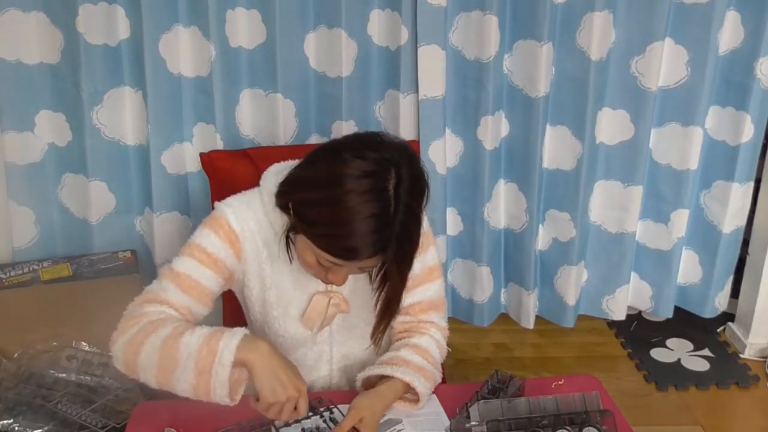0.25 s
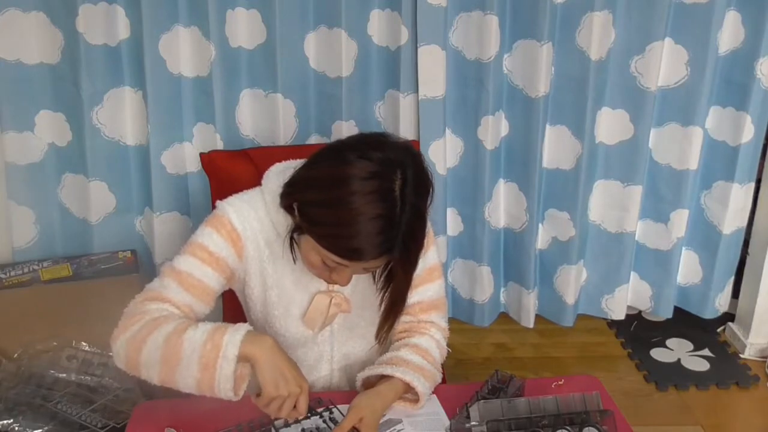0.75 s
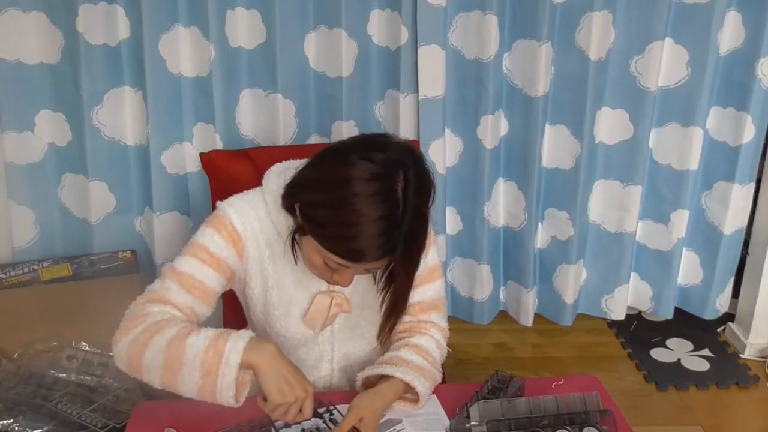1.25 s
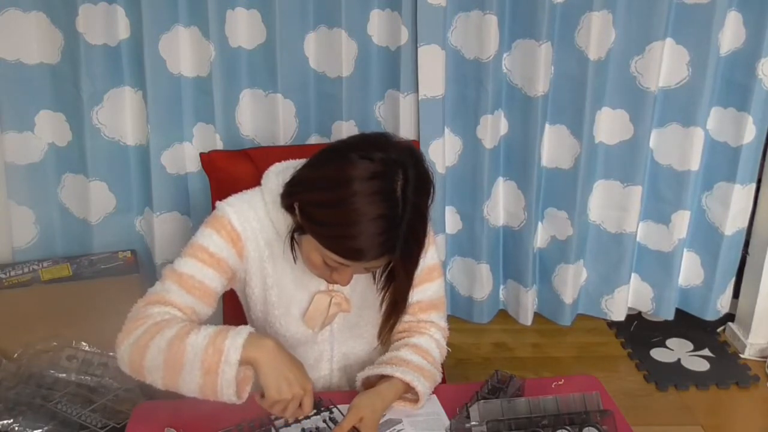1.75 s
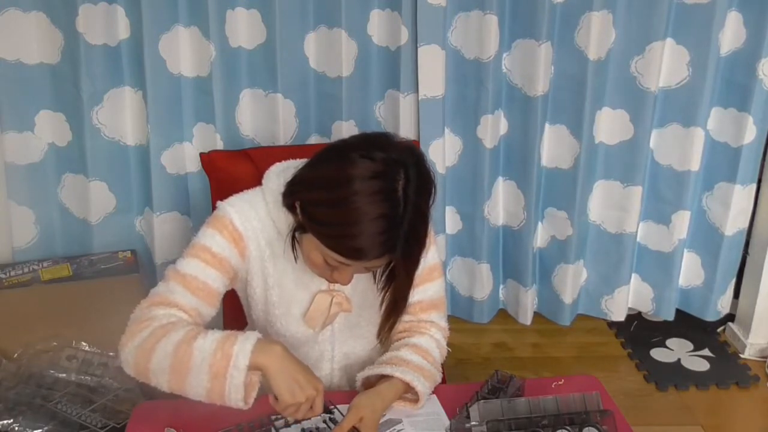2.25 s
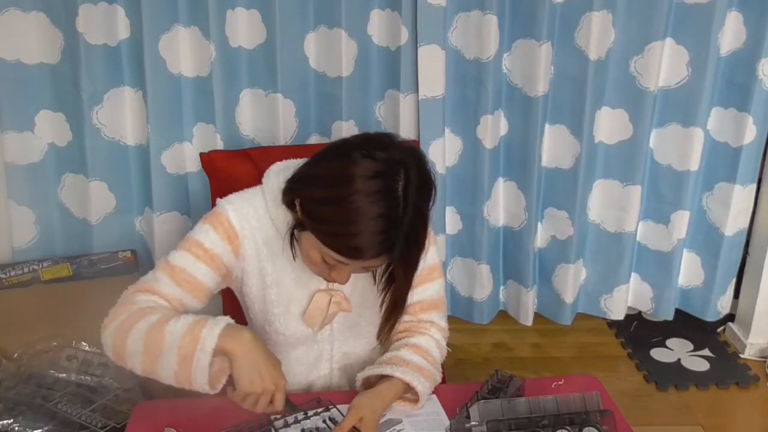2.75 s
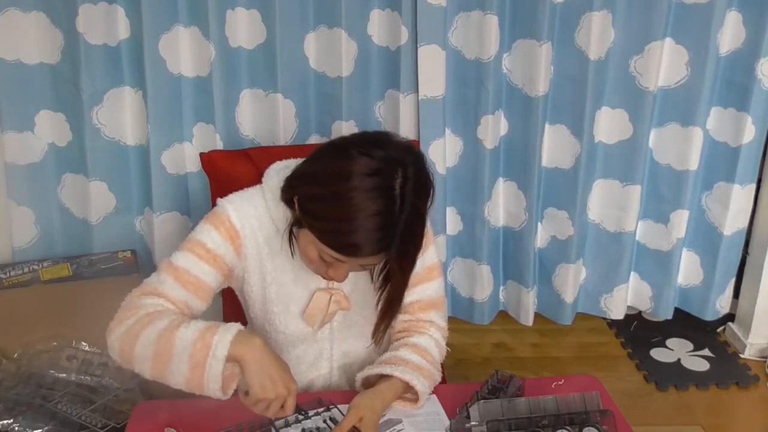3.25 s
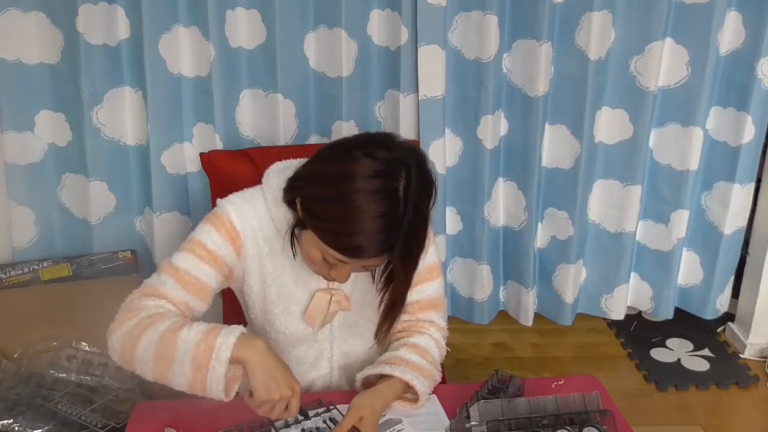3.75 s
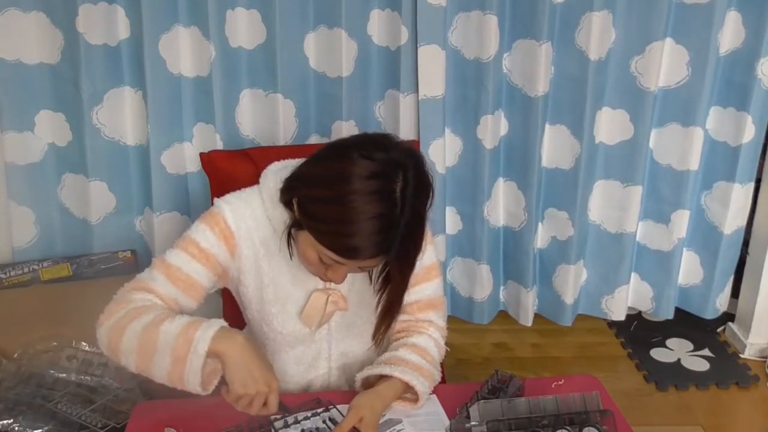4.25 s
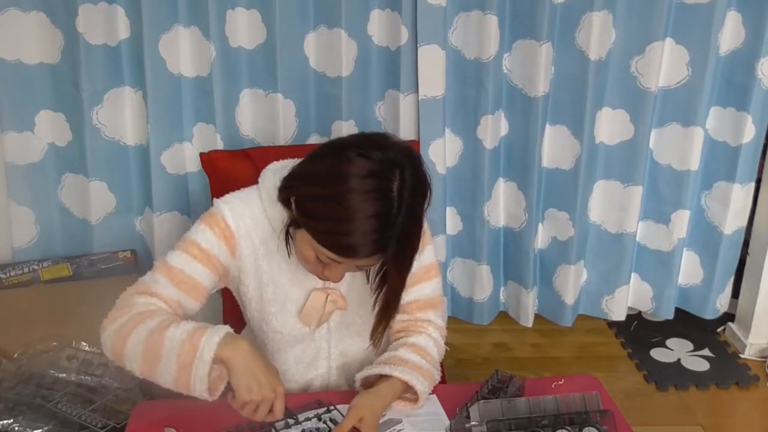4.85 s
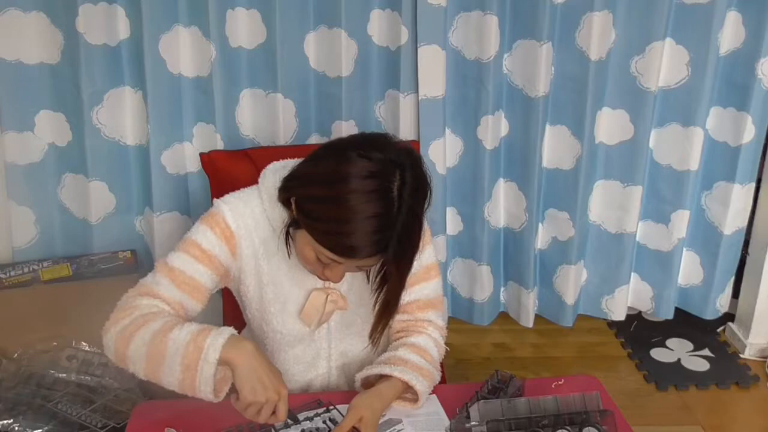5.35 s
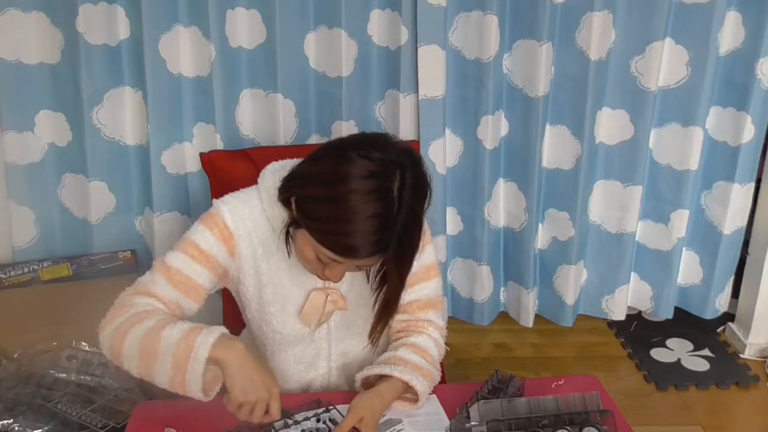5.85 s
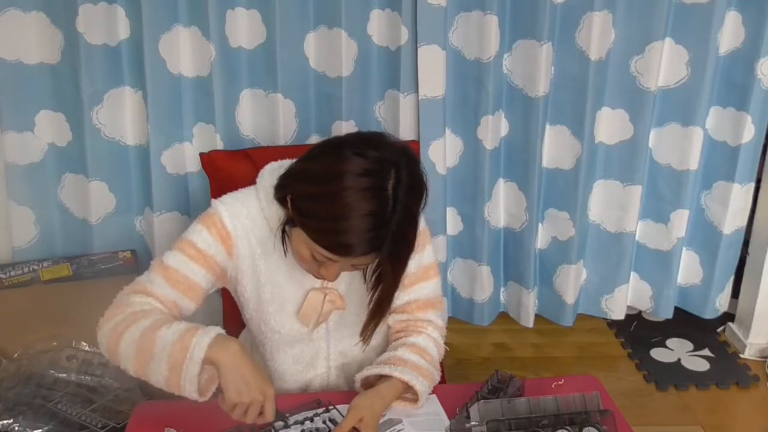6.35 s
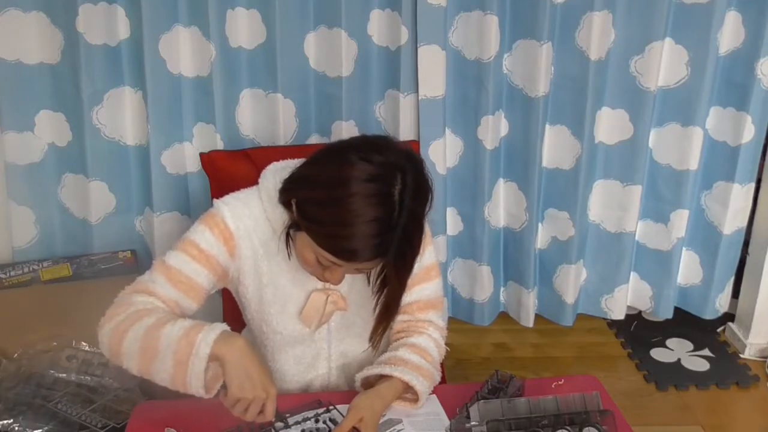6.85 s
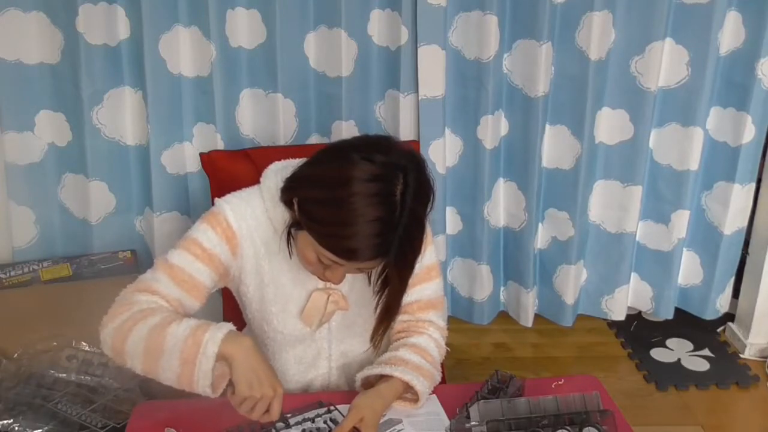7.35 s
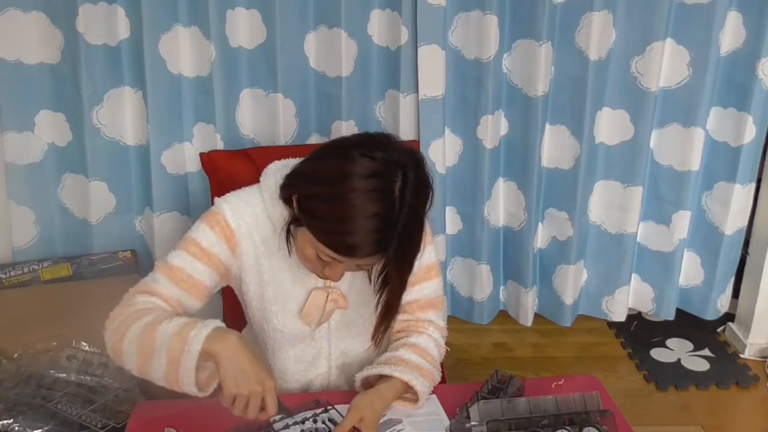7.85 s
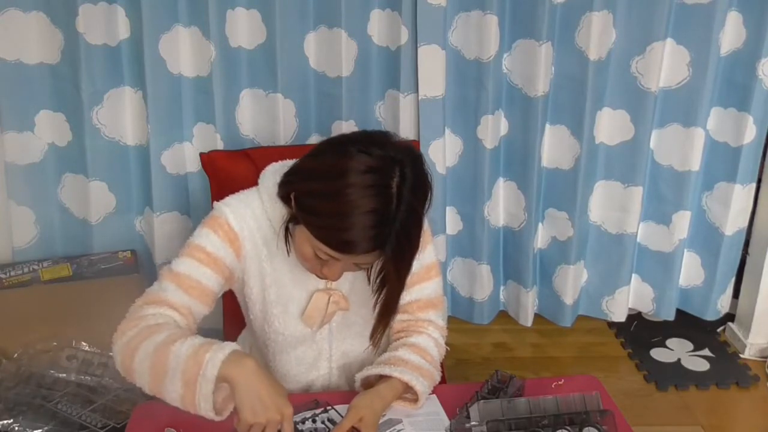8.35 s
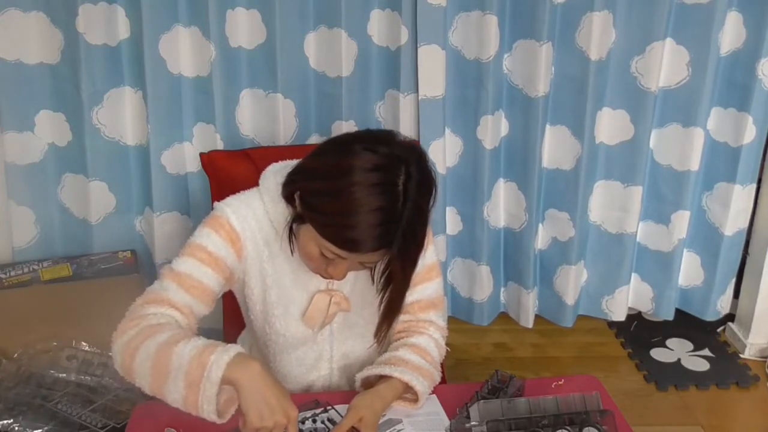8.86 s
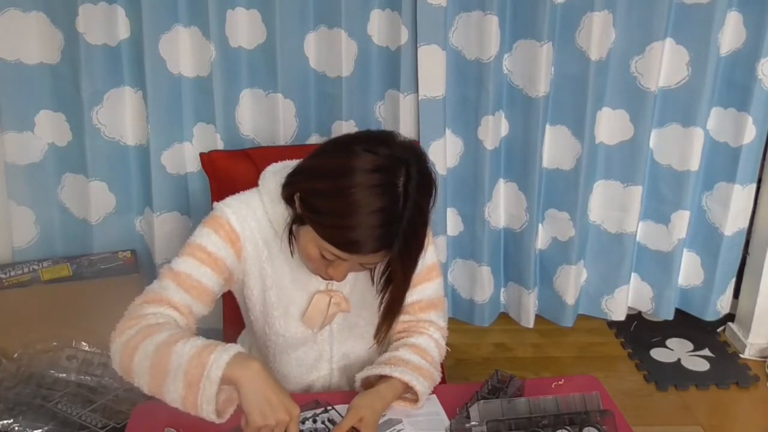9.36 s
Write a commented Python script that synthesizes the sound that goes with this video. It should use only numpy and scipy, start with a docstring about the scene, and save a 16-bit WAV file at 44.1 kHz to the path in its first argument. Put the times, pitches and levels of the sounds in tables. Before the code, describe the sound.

Steel nippers tap, scrape and sharply snip plastic parts from a rattly frame at a table, over a steady low fan hum.

```python
"""In a small curtained room, parts are cut from a plastic model kit frame with steel nippers, at a table.
The jaws tap and scrape on the frame and ring briefly; each cut is a sharp crack that shakes the frame.
Contacts are short coloured noise bursts, rings are dying sine waves, and sliding is a run of tiny slips.
A ventilation fan hums steadily behind: shaped noise with resonances, a mains hum, hiss and a thin whine."""
import sys
import numpy as np
from scipy import signal
from scipy.fft import rfft, irfft
from scipy.io import wavfile
from scipy.ndimage import uniform_filter1d

SR = 44100
rng = np.random.default_rng(int(sys.argv[2]) if len(sys.argv) > 2 else 0)


def transcribe(u):
    """Save the signal u as a 16-bit wav file named by the first command-line argument.

    u: samples, shape (n,) or (channels, n), limited to [-1, 1]; the rate is SR.
    q: integer samples, one column per channel.
    """
    v = np.clip(np.atleast_2d(u).T, -1, 1)
    q = np.round(v * 32767).astype(np.int16)
    wavfile.write(sys.argv[1], SR, q)


N = 423360  # length of the scene in samples
SIZE = 8192  # length of one short sound in samples
AGE = np.arange(SIZE) / SR  # seconds since a short sound began

# colour of fine friction and of ticks: pitch_hz [Hz], level_db [dB]
FRICTION_COLOUR = [(1500, -28), (4000, -14), (6000, -11.5), (8000, 1.5), (11300, 0), (13500, -4),
                   (16000, -19)]


def from_db(db):
    """Turn decibels into a gain."""
    return 10 ** (np.asarray(db) / 20)


def at_hz(points, hz):
    """Read a spectrum's level in dB at any pitch, joining its points on a log-frequency axis."""
    point_hz, level_db = np.transpose(points)
    return np.interp(np.log(np.maximum(hz, 1)), np.log(point_hz), level_db)


def dying(t60):
    """Envelope that falls by 60 dB in t60 seconds."""
    return np.exp(-np.log(1000) * AGE / t60)


def unit_energy(x):
    """Scale a sound so that its squares sum to one."""
    return x / np.sqrt(np.sum(x ** 2) + 1e-20)


def add(track, s, sound):
    """Mix a short stereo sound into the track at a time in seconds."""
    start = max(round(s * SR), 0)
    track[:, start:start + SIZE] += sound[:, :max(N - start, 0)]


def coloured(x, spectrum, tilt_db=0, size=161):
    """Give a sound a colour, tilted about 8 kHz, with a filter that never acts early and keeps the energy."""
    hz = np.maximum(np.fft.rfftfreq(SIZE, 1 / SR), 1)
    octaves = np.log2(np.maximum(hz, 1500) / 8000)
    source = rfft(x, SIZE)
    own_colour = np.sqrt(uniform_filter1d(np.abs(source) ** 2, size) + 1e-12)
    wanted_colour = from_db(at_hz(spectrum, hz) + tilt_db * octaves)
    # folding the cepstrum makes the filter minimum-phase: it acts as soon as it can, but never early
    cepstrum = irfft(np.log(wanted_colour / own_colour))
    cepstrum[1:SIZE // 2] *= 2
    cepstrum[SIZE // 2 + 1:] = 0
    filtered = irfft(source * np.exp(rfft(cepstrum)))
    return unit_energy(filtered) * np.sqrt(np.sum(x ** 2))


def burst(t60, spike=0.38, rise_s=0.00026):
    """A contact: a spike and a spray of tiny fractures, made of noise, that builds and dies at once."""
    envelope = dying(t60)
    spray = unit_energy(rng.standard_normal(SIZE) * envelope * (1 - np.exp(-AGE / rise_s)))
    spray[0] += spike * rng.choice([-1, 1])
    return unit_energy(spray) * np.sqrt(np.sum(envelope ** 2))


def ping(hz, t60):
    """One vibration that starts at an rms of one and dies away."""
    return np.sqrt(2) * np.sin(2 * np.pi * hz * AGE) * dying(t60)


def ringing(modes, spread_db, detune):
    """Every blow excites the modes anew; the grip shifts their pitch a little."""
    hz, level_db, t60 = np.transpose(modes)
    strength, shift, phase = rng.standard_normal((3, len(hz)))
    shifted_hz = hz * (1 + detune * shift)
    waves = np.sin(2 * np.pi * shifted_hz[:, None] * AGE + phase[:, None])
    return from_db(level_db + spread_db * strength) @ (waves * dying(t60[:, None]))


def frame_ring(count=4):
    """The many runners of the frame split each mode into a dense, quickly damped cluster."""
    # plastic frame, around which each pitch and level varies: pitch_hz [Hz], level_db [dB], t60_s [s]
    frame_modes = [(1397, 3, 0.05), (1950, 2.5, 0.063), (2233, 3.5, 0.033), (2650, 0, 0.035),
                   (3150, -1.5, 0.11), (3630, 4, 0.08), (4300, 6, 0.08), (5820, 8, 0.057), (6880, 7, 0.04)]
    copies = sum(ringing(frame_modes, spread_db=1.5, detune=0.06) for _ in range(count))
    return copies / np.sqrt(count)


def knock(knock_t60=0.036):
    """The dull bump of the frame on the table."""
    # colour of the bump: pitch_hz [Hz], level_db [dB]
    knock_colour = [(80, -25), (200, -6), (400, -8.5), (780, 0.5), (1300, -10), (2500, -32), (8000, -61)]
    return coloured(burst(knock_t60), knock_colour)


def tick(tilt_db, tick_t60=0.004):
    """A single, very short tick of plastic."""
    return coloured(burst(tick_t60), FRICTION_COLOUR, tilt_db)


def slips(length, per_s):
    """Random stick-slip impulses that swell and fade over one stroke."""
    stroke = np.sin(np.pi * np.minimum(AGE / length, 1))
    happens = rng.random(SIZE) < per_s / SR
    impulses = happens * rng.standard_normal(SIZE) * stroke
    return unit_energy(impulses) * np.sqrt(np.sum(stroke ** 2))


def reflections(t60, delay_s, width):
    """A dense stereo train of echoes of unit energy that fades in around a delay."""
    fade_in = np.clip(AGE / delay_s - 0.5, 0, 1)
    mid, side = rng.standard_normal((2, SIZE)) * dying(t60) * fade_in
    return np.array([unit_energy(mid + width * side), unit_energy(mid - width * side)])


def in_room(x, wet_db=0, absorb=0.54):
    """Add quick table echoes and a tail dulled by curtains; the hands move, so the echoes always differ."""
    early = from_db(-2) * reflections(t60=0.028, delay_s=0.0013, width=0.68)
    tail = from_db(1) * reflections(t60=0.19, delay_s=0.0038, width=0.52)
    tail = signal.lfilter([1 - absorb], [1, -absorb], tail)
    echoes = signal.fftconvolve(x[None], early + tail, axes=1)[:, :SIZE]
    return x + from_db(wet_db) * echoes


def panned(x, left_db):
    """Make the left ear louder than the right by so many dB."""
    return x * from_db([[left_db / 2], [-left_db / 2]])


def steady_noise(psd_db):
    """Noise with a given level in dB per Hz at each frequency of the full-length grid."""
    return irfft(rfft(rng.standard_normal(N)) * from_db(psd_db), N) * np.sqrt(SR / 2)


def background(mains_hz=50.2, mains_db=-80.5, whine_hz=7900, whine_width_hz=50, whine_db=-103):
    """Fan rush with the resonances it drives, mains hum, hiss and a thin electronic whine."""
    # air rush of the fan, before the resonances lift it: pitch_hz [Hz], level_db [dB per Hz]
    fan_rush = [(20, -118), (45, -99), (105, -94), (140, -85), (210, -82.5), (330, -88), (600, -85.5),
                (880, -85), (1050, -92), (1280, -95), (1500, -102.5), (1750, -109.5), (2500, -117),
                (6000, -139)]
    # resonances driven by the fan: pitch_hz [Hz], width_hz [Hz], lift_db [dB]
    fan_modes = [(47.3, 12, 5.7), (155.5, 20, 11.9), (199.2, 25, 6.4), (232.8, 18, 8.9), (302.5, 17.4, 9.4),
                 (382.8, 34, 10.7), (426, 25, 3.5), (507.4, 18, 6.4), (535, 3.8, 3.9), (631.5, 25.6, 7.3),
                 (1506, 14, 8.8), (2064, 230, 5.5)]
    # part of the rush that differs between the ears: pitch_hz [Hz], level_db [dB per Hz]
    fan_side = [(20, -124), (50, -100), (90, -97), (150, -89.5), (290, -88.5), (450, -91), (880, -90.5),
                (1100, -96), (1450, -104), (1750, -112), (2500, -119), (6000, -139)]
    # microphone hiss common to both ears: pitch_hz [Hz], level_db [dB per Hz]
    hiss_mid = [(2000, -119), (4200, -117.5), (6000, -120), (7000, -118), (7900, -113.5), (8700, -113),
                (9600, -111), (10000, -106.5), (10500, -111.5), (11200, -108), (12400, -115),
                (15700, -119.5)]
    # microphone hiss that differs between the ears: pitch_hz [Hz], level_db [dB per Hz]
    hiss_side = [(2000, -118.5), (4200, -117.5), (6000, -121.5), (7800, -116), (10100, -113.5),
                 (13000, -116), (15700, -119.5)]
    hz = np.fft.rfftfreq(N, 1 / SR)
    lift_db = sum(db / (1 + (2 * (hz - mode_hz) / width_hz) ** 2) for mode_hz, width_hz, db in fan_modes)
    hum = from_db(mains_db) * np.sqrt(2) * np.sin(2 * np.pi * mains_hz * np.arange(N) / SR)
    # the whine is a narrow band of noise
    whine_drop_db = 20 * np.log10(1 + ((hz - whine_hz) / whine_width_hz) ** 2)
    whine = steady_noise(whine_db - whine_drop_db)
    mid = steady_noise(at_hz(fan_rush, hz) + lift_db) + steady_noise(at_hz(hiss_mid, hz)) + hum
    side = steady_noise(at_hz(fan_side, hz)) + steady_noise(at_hz(hiss_side, hz)) + whine
    return np.array([mid + side, mid - side])


def scrapes(slips_per_s=4000, catches_per_s=800, squeak_t60=0.0065):
    """Sliding is a dense run of small slips, with a resonance squeaking; coarser catches grate in the frame."""
    # jaws or frame sliding, levels within the work: middle_s [s], length_s [s], friction_db [dB],
    # grit_db [dB], squeak_hz [Hz], squeak_db [dB]
    scrape_list = [(0.049, 0.1, -71, -77, 8300, -80), (0.71, 0.05, -80, -85, 11100, -74),
                   (0.993, 0.05, -78, -83, 11200, -72), (1.437, 0.11, -72, -72, 8400, -76),
                   (1.59, 0.11, -75, -74, 8400, -80), (2.502, 0.12, -68, -74, 11200, -73),
                   (2.572, 0.078, -72, -63, 3000, -80), (4.001, 0.055, -55.5, -58.5, 8500, -56),
                   (4.16, 0.06, -59, -69, 11000, -63), (5.261, 0.12, -76, -73.5, 8400, -84),
                   (5.723, 0.058, -71, -70, 3300, -71), (5.871, 0.057, -63, -67, 8300, -78),
                   (5.897, 0.055, -61.5, -64, 8800, -60), (7.524, 0.04, -64, -61.5, 11200, -71),
                   (7.703, 0.074, -62, -66.5, 8400, -72), (7.83, 0.047, -63, -69, 8400, -55),
                   (8.997, 0.08, -83, -77, 3370, -76)]
    # colour of coarse grit: pitch_hz [Hz], level_db [dB]
    grit_colour = [(500, -14), (1300, 3), (2200, -1), (3200, -5.5), (4200, -6.5), (6000, -17), (9000, -22),
                   (16000, -38)]
    out = np.zeros((2, N))
    for middle_s, length_s, friction_db, grit_db, squeak_hz, squeak_db in scrape_list:
        stroke = slips(length_s, slips_per_s)
        friction = from_db(friction_db) * coloured(stroke, FRICTION_COLOUR)
        grit = from_db(grit_db) * coloured(slips(length_s, catches_per_s), grit_colour)
        resonance = unit_energy(ping(squeak_hz, squeak_t60))
        squeak = from_db(squeak_db) * signal.fftconvolve(stroke, resonance)[:SIZE]
        add(out, middle_s - length_s / 2, in_room(friction + grit + squeak))
    return out


def taps(tap_t60=0.0085, runner_t60=0.0071, contact_db=0.56, frame_db=-29, steel_db=-1.3, knock_db=-23):
    """Steel meets plastic: every contact ticks, and the jaws, the gripped runner and the frame ring."""
    # the jaws strike the frame, often several times in quick succession, levels within the work:
    # start_s [s], level_db [dB], ring_db [steel ring, dB relative to the tap before steel_db],
    # tilt_db [treble tilt, dB per octave]
    tap_list = [(0.015, -50.5, -27, -3), (1.353, -47, -24, 13), (1.378, -53, -5, -6),
                (1.3855, -31.5, -24, 0), (1.3882, -36, -20, -2), (1.4271, -33, 0, 2),
                (1.432, -31.5, -7, 1.5), (1.4365, -42, -6, 1), (2.3245, -54.5, -8, -7),
                (2.3665, -37, -9, 0), (2.371, -39.5, -11, -2.5), (2.3765, -51, -10, 3),
                (3.405, -58, -7, -7), (3.507, -56, -19, -9), (3.527, -53.5, -17, -6), (4.0233, -39, -13, 3),
                (4.029, -39.5, -11, -1), (5.7016, -42, -7, -8), (5.705, -37, -12, -2.5),
                (6.980, -51, -14, -7), (6.9856, -46, -14, -4), (6.993, -38.5, -18, -6.5),
                (7.001, -32.5, -18, -0.5), (7.18, -44.5, -7, -3.5), (7.191, -45, -8, -6),
                (7.2001, -41, -3, -2.5), (7.207, -49, -6, -8), (7.210, -42.5, -9, -5.5),
                (7.4218, -58.5, -7, -7), (7.503, -41, -10, -1), (7.508, -42.5, -10, -4),
                (7.517, -41, -14, -3), (7.540, -41, -1, -3.5), (7.5895, -37, -14, 0),
                (7.5966, -35, -5.5, 0.5), (7.601, -42.5, 3, -4), (7.668, -46, -10, -4),
                (7.682, -53, -12, -3), (7.718, -41, -8, 0), (7.7268, -29, -21, 2.5), (7.746, -34, -8, 5),
                (7.7528, -25.5, 0.5, 2.5), (7.758, -28, -1, 0), (7.764, -33, 3, 7), (7.794, -33, -5, -2),
                (7.8, -32, -6, 0), (7.848, -39, -7.5, -2.5), (7.934, -55.5, -16, -10),
                (8.0205, -49, -18, -9), (8.035, -55, -25, -8), (8.141, -45, -9, -8),
                (8.151, -44.5, -17, -6), (8.404, -50, -7.5, -8), (8.412, -53.5, -11, -9),
                (8.591, -46, -7, -4), (8.637, -54.5, -19, -9), (8.673, -53.5, -17, -8),
                (8.938, -57, -18, -6)]
    # holds on the frame: around_s [time near which the hold's pitches apply, s],
    # shift_hz [shift of the jaws' pitch, Hz], runner_hz [pitch of the gripped runner, Hz],
    # runner_db [its ring, dB relative to the tap]
    hold_list = [(1.4, 130, 6900, -5.5), (2.37, 130, 6900, -6), (3.4, 100, 4200, -10),
                 (4.03, 130, 8400, -7), (5.7, 100, 4900, -9), (7.0, 140, 4850, -10), (7.2, 140, 3350, -12),
                 (7.54, 10, 3600, -16), (7.8, 0, 10800, -9), (8.14, 100, 6430, -12), (8.6, 120, 4200, -14)]
    # colour of a tap: pitch_hz [Hz], level_db [dB]
    tap_colour = [(400, -14), (1300, -24), (2100, -10.5), (2900, -10), (4200, -9.5), (5400, -9), (6900, -4),
                  (7650, -2.5), (8400, 1), (9500, 2), (11300, -1), (12200, -6), (13200, -5), (14300, -23),
                  (16000, -39)]
    # steel nippers, before the hold shifts their pitch: pitch_hz [Hz], level_db [dB], t60_s [s]
    steel_modes = [(7880, -10, 0.02), (8090, -3, 0.025), (8260, 6, 0.031), (8420, -8, 0.018),
                   (9600, -13, 0.02), (11000, -8, 0.032), (11500, -13, 0.025)]
    out = np.zeros((2, N))
    for start_s, level_db, ring_db, tilt_db in tap_list:
        # the hold nearest in time sets the pitches
        _, shift_hz, runner_hz, runner_db = min(hold_list, key=lambda hold: abs(hold[0] - start_s))
        hit = burst(tap_t60, spike=0.37, rise_s=0.00035)
        contact = from_db(contact_db) * coloured(hit, tap_colour, tilt_db)
        held_modes = np.array(steel_modes) + [shift_hz, 0, 0]
        steel = from_db(steel_db + ring_db) * ringing(held_modes, spread_db=2.0, detune=0.0018)
        plastic = from_db(frame_db) * frame_ring() + from_db(runner_db) * ping(runner_hz, runner_t60)
        bump = from_db(knock_db) * knock()
        add(out, start_s, in_room(from_db(level_db) * (contact + plastic + bump), wet_db=0.0))
        add(out, start_s, in_room(from_db(level_db) * steel, wet_db=-3.5))
    return out


def ticks():
    """Stressed plastic gives with single, very short ticks."""
    # tiny dry ticks: start_s [s], level_db [dB], tilt_db [treble tilt, dB per octave]
    tick_list = [(0.047, -53, -4), (0.066, -56, -11), (1.549, -53, -12), (1.591, -47, -8), (1.621, -53, -6),
                 (1.7142, -51.5, -10.5), (4.116, -57, -10), (5.271, -49.5, -3), (5.884, -44, -2),
                 (7.915, -57, 2), (8.451, -57, -14)]
    out = np.zeros((2, N))
    for start_s, level_db, tilt_db in tick_list:
        add(out, start_s, in_room(from_db(level_db) * tick(tilt_db), wet_db=-2))
    return out


def frame_bends(bend_t60=0.029, knock_db=-1):
    """The frame bends: one bending mode rings softly, with a bump and a tick."""
    # frame bending: soft nudges, and the low woody body under some snips and hard taps, levels within the
    # work: start_s [s], level_db [dB], pitch_hz [Hz], tick_db [dB], tilt_db [tick's treble tilt, dB per octave]
    bend_list = [(0.926, -57.5, 2080, -53, -8), (1.131, -55, 1890, -52, -10), (1.818, -57, 2480, -54, -12),
                 (2.540, -47, 1360, -38.5, -1), (2.541, -55, 3400, -53, -12), (2.543, -43.5, 990, -60, -10),
                 (2.570, -50, 2150, -49, -7), (2.595, -54, 2380, -52, -7), (2.639, -58, 2210, -52, -9),
                 (3.19, -62, 2110, -59, -8), (3.403, -60, 3400, -58, -11), (3.406, -61, 2050, -59, -11),
                 (3.969, -40.5, 775, -50, -12), (3.971, -43, 1890, -48, -10), (4.480, -56, 1920, -49, -4),
                 (4.487, -67, 3400, -55, -10), (5.6897, -53, 1940, -48, -12), (5.706, -54, 1460, -52, -10),
                 (7.503, -49, 1400, -54, -8), (7.754, -45, 1530, -44, -11)]
    out = np.zeros((2, N))
    for start_s, level_db, pitch_hz, tick_db, tilt_db in bend_list:
        bending = ping(pitch_hz, bend_t60) / np.sqrt(2)
        body = bending + from_db(knock_db) * knock()
        add(out, start_s, in_room(from_db(level_db) * body, wet_db=-4.5))
        add(out, start_s, in_room(from_db(tick_db) * tick(tilt_db), wet_db=-1.0))
    return out


def snips(stub_t60=0.0034, knock_db=-20):
    """Plastic parts with cracks and a high ping; the frame rings and knocks on the table."""
    # cracks of the snips, several rows to one snip, and a thin high tick at 4.14 s, levels within the work:
    # start_s [s], level_db [dB], crack_t60_s [s], tilt_db [treble tilt, dB per octave],
    # stub_hz [ping of the freed stub, Hz], stub_db [dB relative to the crack],
    # frame_db [frame ring, dB relative to the crack]
    snip_list = [(3.9675, -23, 0.004, 2, 10900, -4, -34.5), (3.9698, -32, 0.009, -4, 11200, 0, -31),
                 (3.9795, -42, 0.009, -5, 8400, 1, -30), (4.1375, -43.5, 0.009, 9, 10900, 6, -38),
                 (5.6896, -31, 0.005, 14, 10400, 1, -36), (6.991, -31.5, 0.009, 1, 11470, -1, -29),
                 (7.4977, -35, 0.005, 5, 12600, -6, -31), (9.5626, -21.5, 0.0046, -6, 12300, 4.5, -35),
                 (9.5643, -31.5, 0.009, -3, 7250, 4, -32), (9.567, -38, 0.009, -6, 4200, 2, -30),
                 (9.5744, -30, 0.009, -3, 8560, -2, -31), (9.585, -36, 0.006, 1, 9800, -6, -34)]
    # colour of a crack: pitch_hz [Hz], level_db [dB]
    crack_colour = [(300, -37), (900, -13.5), (2000, -9.5), (2800, -12), (4200, -3.5), (5500, -3),
                    (7200, 3), (9500, 5), (11300, 10.5), (12800, 3), (14000, -1), (15700, -5)]
    out = np.zeros((2, N))
    for start_s, level_db, crack_t60_s, tilt_db, stub_hz, stub_db, frame_db in snip_list:
        crack = coloured(burst(crack_t60_s, spike=0.5, rise_s=0.00028), crack_colour, tilt_db)
        stub = from_db(stub_db) * ping(stub_hz, stub_t60)
        frame = from_db(frame_db) * frame_ring()
        bump = from_db(knock_db) * knock()
        add(out, start_s, in_room(from_db(level_db) * (crack + stub + frame + bump), wet_db=-1.5))
    return out


def scene(work_db=-2.5):
    """The work at the table near the middle, over the steady background a little to the right."""
    work = from_db(work_db) * (scrapes() + taps() + frame_bends() + snips()) + ticks()
    return panned(background(), left_db=-0.7) + panned(work, left_db=0.5)


def record(dry, left_dullness=0.084, cutoff_hz=16300):
    """The left microphone is slightly duller; the top is cut steeply."""
    left = signal.lfilter([1 - left_dullness], [1, -left_dullness], dry[0])
    ears = np.array([left, dry[1]])
    return signal.sosfilt(signal.cheby2(20, 50, cutoff_hz, fs=SR, output="sos"), ears)


dry = scene()
out = record(dry)
transcribe(out)
```